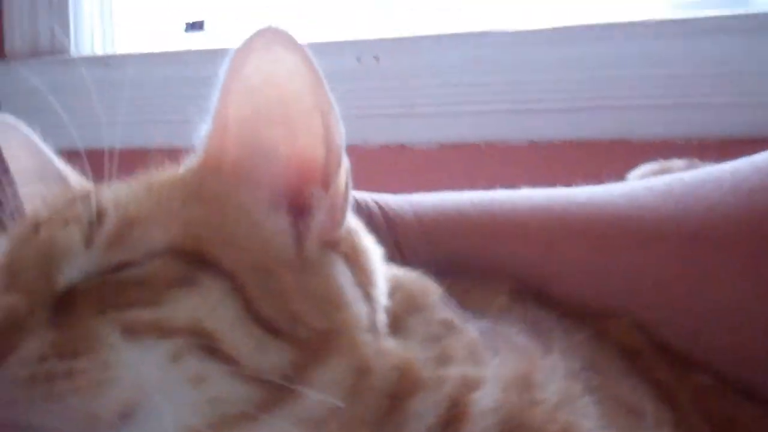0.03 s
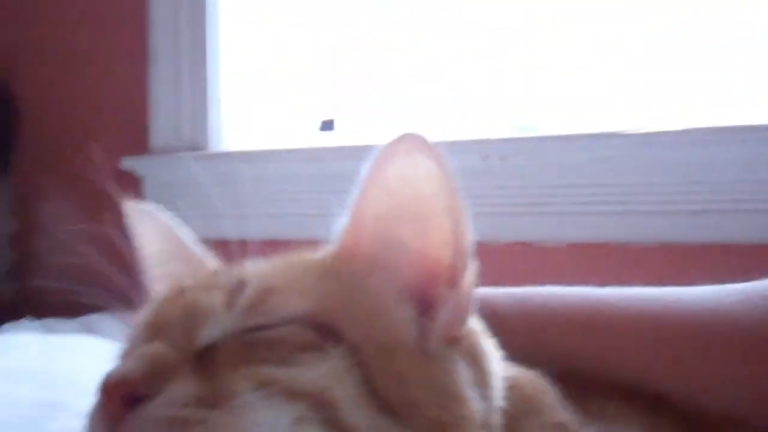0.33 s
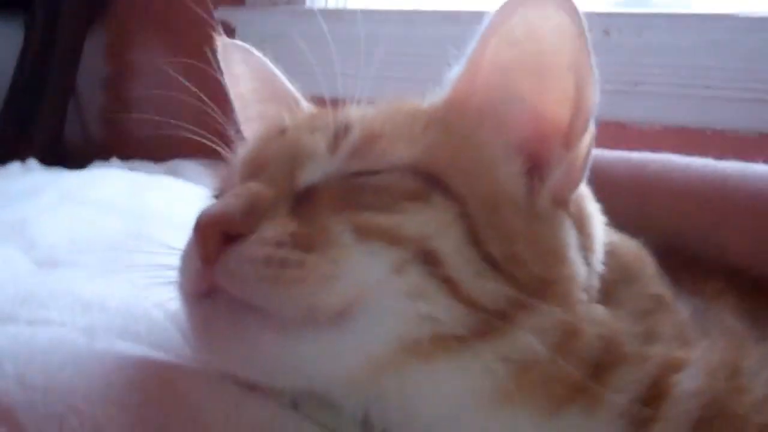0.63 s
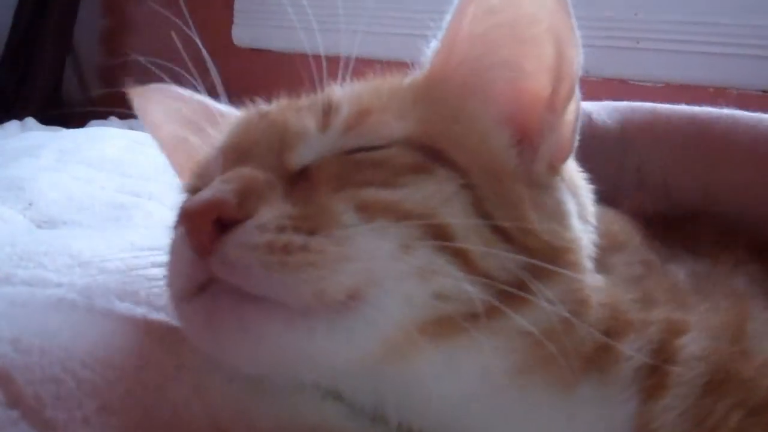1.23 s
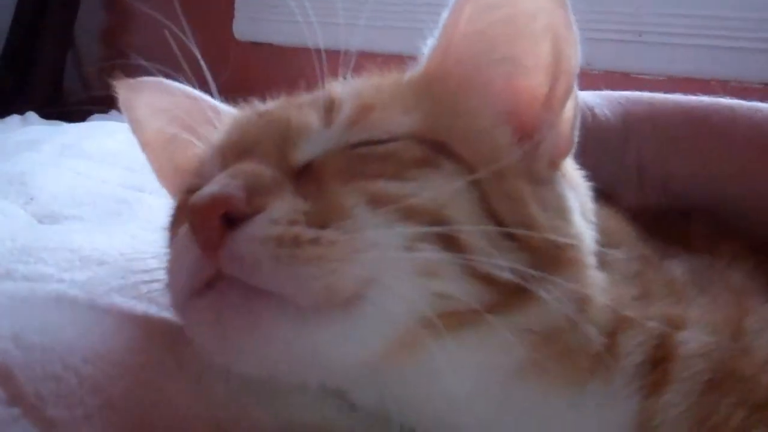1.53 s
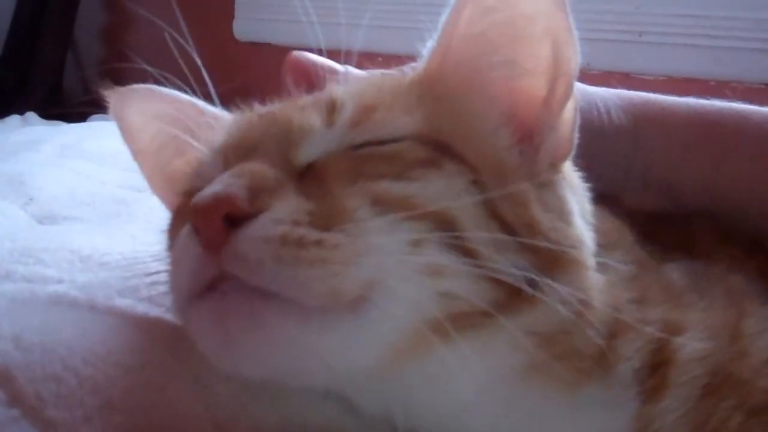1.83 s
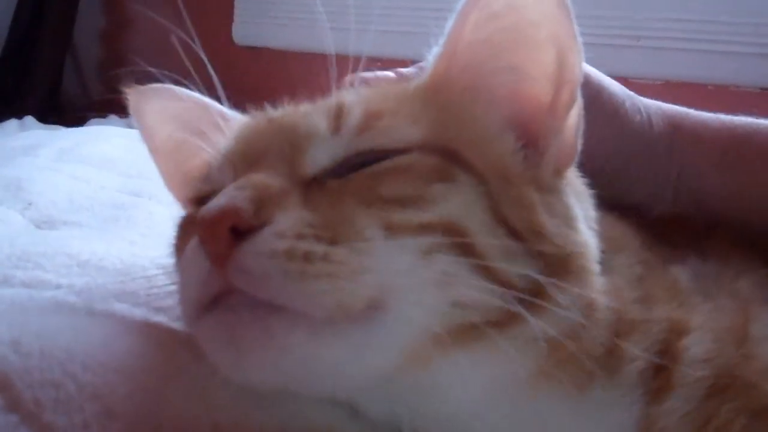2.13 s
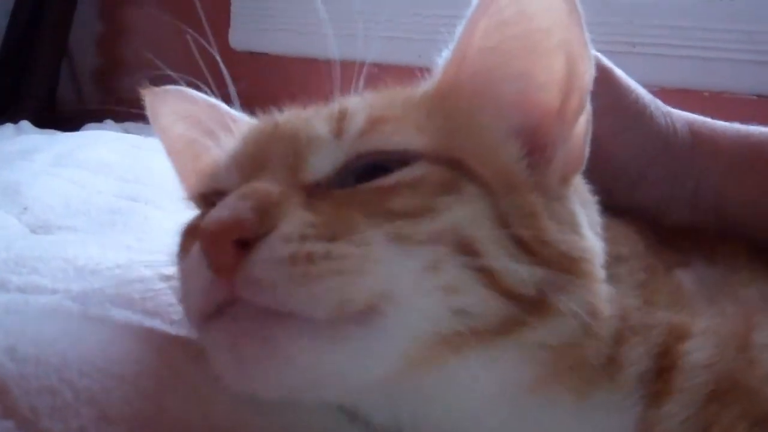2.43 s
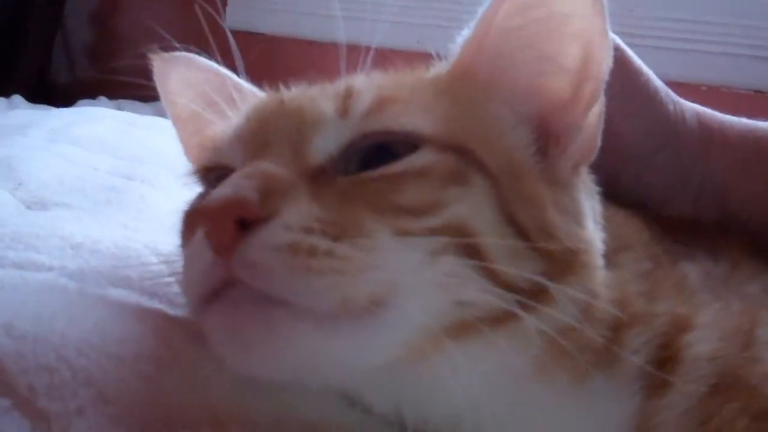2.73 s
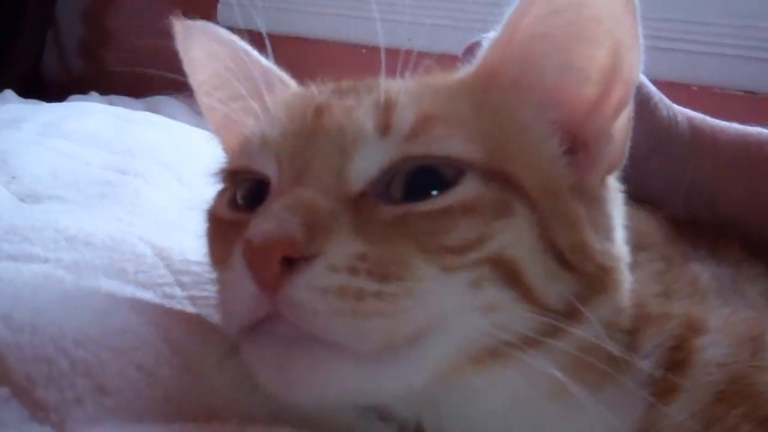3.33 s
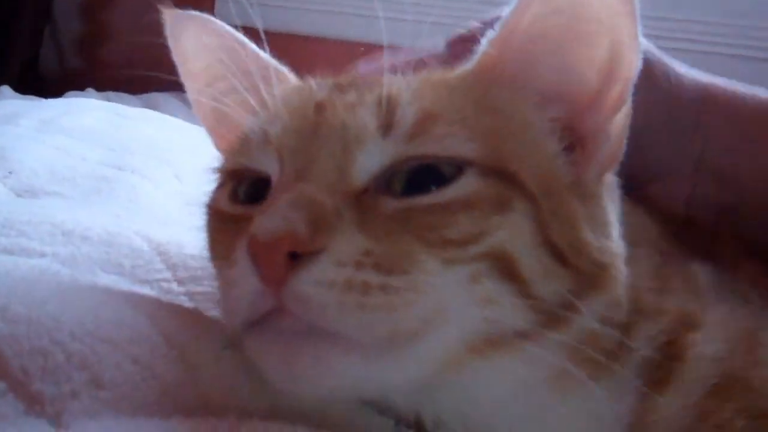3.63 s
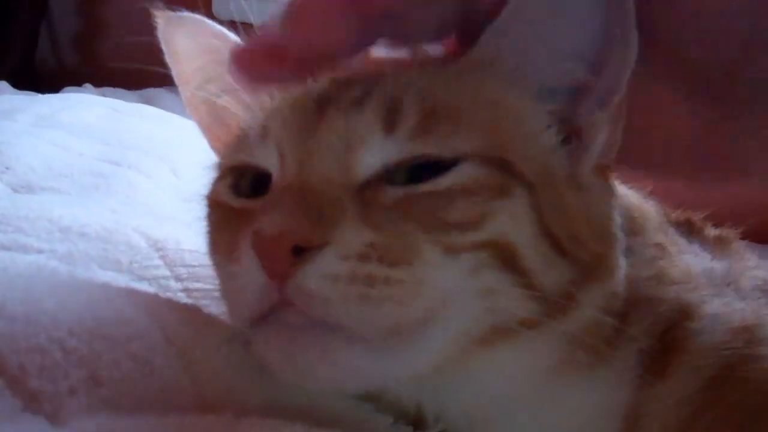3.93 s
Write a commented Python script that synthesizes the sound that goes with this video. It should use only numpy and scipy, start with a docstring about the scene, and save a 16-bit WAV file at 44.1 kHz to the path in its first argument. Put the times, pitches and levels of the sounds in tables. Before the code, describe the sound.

A kitten gives four short, low meows close by over soft room hiss.

```python
"""A kitten gives four short, low meows close by in a quiet, soft-furnished room. Each is vocal-fold
harmonics shaped by throat and mouth: a thin coo that mostly drops to a buzzier register and flips up.
The first, at 0.14 s, trills; a hand strokes fur faintly; the second comes at 1.4 s. At 2.4 s a chirp
leads into the third, with tiny ticks and more strokes in and after it. The last comes at 3.6 s.
Room hiss, hum and a faint high whine run throughout."""
import sys
import numpy as np
from scipy import signal
from scipy.fft import rfft, irfft
from scipy.io import wavfile

SR = 44100
rng = np.random.default_rng(int(sys.argv[2]) if len(sys.argv) > 2 else 0)


def materialize(psi):
    """Save the field psi as 16-bit PCM at rate SR to the path in sys.argv[1].

    A 1-D psi becomes a single channel; in a 2-D psi each row is a channel.
    """
    bounded = np.clip(np.atleast_2d(psi).T, -1, 1)
    quanta = np.round(bounded * 32767).astype(np.int16)
    wavfile.write(sys.argv[1], SR, quanta)


N = 176400
THROAT_EDGE_HZ, MOUTH_WIDTH_HZ, SHEEN_HZ = 2066, 610, 12700


def kitten():
    """Four meows and a lead-in chirp, a little to the left, with a faint short room tail."""
    # One entry per call: meow, meow, chirp, meow, meow.
    # vocal-fold pitch: time_s, pitch_hz
    pitches = [
        [(0.14, 637.5), (0.164, 584.4), (0.176, 593.7), (0.24, 413), (0.252, 435), (0.266, 404), (0.282, 430.7),
         (0.324, 432), (0.37, 484), (0.404, 398), (0.434, 467), (0.448, 571), (0.48, 583)],
        [(1.372, 637.6), (1.398, 620), (1.42, 613.5), (1.432, 573.5), (1.446, 592.4), (1.462, 577),
         (1.479, 524), (1.488, 540), (1.512, 520), (1.523, 499), (1.535, 540.6), (1.55, 447.4), (1.579, 474.3),
         (1.597, 450), (1.628, 442), (1.642, 458.2), (1.685, 438), (1.72, 437), (1.745, 407), (1.772, 423),
         (1.783, 540), (1.809, 541)],
        [(2.414, 697), (2.432, 606), (2.448, 556), (2.468, 637.7)],
        [(2.486, 616), (2.52, 609.5), (2.65, 560), (2.702, 590), (2.72, 625), (2.73, 649), (2.74, 652),
         (2.754, 660), (2.8, 580)],
        [(3.637, 589.5), (3.657, 554.5), (3.669, 455.4), (3.682, 548.4), (3.692, 493.4), (3.7, 381),
         (3.735, 415), (3.745, 390), (3.764, 393), (3.778, 349), (3.798, 382.4), (3.816, 384), (3.825, 423),
         (3.838, 429), (3.85, 515), (3.875, 490)],
    ]
    # voice strength: time_s, fundamental_db, overtone_db, treble_db
    strengths = [
        [(.139, -43, -55, -72), (.146, -43.5, -49.5, -63), (.174, -37.5, -44.5, -65), (.215, -38, -40, -58.5),
         (.255, -40.5, -38, -54), (.29, -38, -37.5, -54.5), (.33, -39, -39.5, -58), (.368, -34, -38.5, -57.5),
         (.405, -43, -37, -51.5), (.436, -33.5, -36.5, -53), (.446, -34.5, -51, -66), (.47, -43.5, -58, -63),
         (.483, -47, -68, -73)],
        [(1.37, -45, -68, -78), (1.379, -38.5, -49, -78), (1.394, -34.5, -48.5, -76), (1.44, -31.5, -42.5, -64),
         (1.505, -30.5, -34.5, -54), (1.535, -29, -36, -56.5), (1.58, -31, -34, -52.5), (1.62, -35, -35, -50),
         (1.714, -36, -36.5, -54), (1.768, -39, -39.5, -57.5), (1.782, -31.5, -48, -68),
         (1.794, -38.5, -57, -73), (1.809, -44.5, -64, -75), (1.817, -54, -72, -74)],
        [(2.414, -50, -58, -60), (2.421, -35.5, -45, -54), (2.438, -31.5, -37, -54), (2.454, -34, -33, -58),
         (2.47, -66, -67, -76)],
        [(2.485, -47, -30, -60), (2.49, -33, -33, -58), (2.505, -32, -32, -48), (2.555, -30.5, -34, -50.5),
         (2.62, -30.3, -35.5, -54), (2.7, -30.5, -38, -59.5), (2.75, -34.5, -53, -66), (2.783, -39, -50, -75),
         (2.8, -51, -74, -76)],
        [(3.634, -44, -66, -75), (3.641, -35, -45, -71), (3.657, -31, -41.5, -62.5), (3.686, -28.5, -40, -63),
         (3.702, -41, -41.5, -58), (3.728, -39.5, -41.5, -59), (3.8, -42, -39.5, -58.5),
         (3.822, -38.5, -56, -58.5), (3.838, -38.5, -45.5, -62), (3.854, -33, -59, -72), (3.872, -45, -62, -60),
         (3.883, -62, -72, -69)],
    ]
    # throat and mouth resonances: first_hz, second_hz, second_db, mouth_db, slope_db_per_octave
    throats = [(1230, 1900, -7, 18.5, -3), (1235, 1800, -7.5, 19, -3.5), (1210, 1750, -7, 14, -10),
               (1170, 1800, -1.5, 22, -3), (1170, 1660, -11, 15, -2)]
    # resonance just under 1 kHz: gain_db
    chests = [2.5, 4, 5, 9.5, -3]
    # thin resonance at the very top: gain_db
    sheens = [-14, -7, -12, -7, -19]
    left, right = sum(meow(*call) for call in zip(pitches, strengths, throats, chests, sheens))
    right_lag_s, tail_t60_s, tail_db = .000018, 0.12, -25.5
    t = np.arange(N) / SR
    direct = np.array([left, np.interp(t - right_lag_s, t, right)])
    tail = rng.standard_normal((2, N // 10)) * from_db(-60 * t[:N // 10] / tail_t60_s)
    tail /= np.sqrt((tail ** 2).sum(1, keepdims=True))
    return direct + from_db(tail_db) * signal.fftconvolve(direct, tail, axes=1)[:, :N]


def meow(pitch, strength, throat, chest_db, sheen_db):
    """One call: vocal-fold harmonics shaped by throat and mouth, with breath pulsed each cycle."""
    # upper mouth resonance: time_s, centre_hz
    mouth_track = [(.15, 4300), (.35, 4300), (.385, 3646), (.405, 3194), (.44, 3470), (1.45, 3900),
                   (1.52, 3600), (1.57, 4300), (1.63, 3980), (1.7, 4350), (1.78, 4220), (2.42, 3700),
                   (2.52, 3490), (2.6, 4100), (2.73, 4160), (3.64, 4800), (3.85, 4800)]
    # voice cracks: centre_s, half_length_s, roughness (0-1), fundamental_dip_db
    cracks = [(0.166, 0.0073, .5, 0.5), (0.187, 0.0082, 1, 6.5), (0.213, 0.0063, 0.56, 7),
              (0.436, 0.0057, 0.65, 2), (1.554, 0.01, 0.03, 5.5), (1.774, .005, 0.32, 3),
              (2.487, 0.0059, 0.41, 0.5), (3.669, 0.0055, 0.19, 7.5), (3.7, 0.0036, 0.08, 2),
              (3.78, 0.0035, 0.25, 30)]
    first_hz, second_hz, second_db, mouth_db, slope_db_per_octave = throat
    first_width_hz, second_width_hz, sheen_sag_hz_per_s = 200, 170, 6700
    trill_crest_s, trill_hz, trill_swing, trill_db = .227, 38.7, 0.09, 3.5
    buzz_hz, thinning_db_per_hz, ramp_s, breath_db = 439.5, 0.07, 0.0031, -12
    span = np.arange(int(strength[0][0] * SR), int(strength[-1][0] * SR))
    t, size = span / SR, len(span)
    fundamental_db, overtone_db, treble_db = along(strength, t)
    mouth_hz, = along(mouth_track, t)
    note_hz, = along(pitch, t)

    trill = np.cos(2 * np.pi * trill_hz * (t - trill_crest_s)) * swell(t, trill_crest_s, 0.1)
    crack = sum(rough * swell(t, s, half) for s, half, rough, _ in cracks)
    dip_db = sum(db * swell(t, s, half) for s, half, _, db in cracks)
    jitter = 0.01023 * (buzz_hz / note_hz) ** 2 * drift(120, size)
    pitch_hz = note_hz * (1 + trill_swing * trill + jitter + 0.146 * crack * drift(435, size))
    phase = 2 * np.pi * np.cumsum(pitch_hz) / SR

    k = np.arange(2, 34)[:, None]
    hz = k * pitch_hz
    formants = (first_hz, first_width_hz), (second_hz, second_width_hz), (mouth_hz, MOUTH_WIDTH_HZ)
    lag_rad = sum(np.pi / 2 + np.arctan(2 * (hz - centre) / width) for centre, width in formants)
    flutter_db = 1.95 * np.minimum(hz / 3000, 1) * np.array([drift(30, size) for _ in k])
    partials = np.cos(k * phase - lag_rad) * from_db(flutter_db)

    # above the buzzy register each further overtone is weaker
    thinning = from_db(-thinning_db_per_hz * np.maximum(pitch_hz - buzz_hz, 0) * (k - 2))
    throat_gain = (resonance(hz, first_hz, first_width_hz)
                   + from_db(second_db) * resonance(hz, second_hz, second_width_hz)
                   + from_db(chest_db) * resonance(hz, 960, 260))
    overtones = mix_partials(partials, thinning * throat_gain / (1 + (hz / THROAT_EDGE_HZ) ** 18))
    sheen_hz = SHEEN_HZ - sheen_sag_hz_per_s * (t - t.mean())  # sinks as the mouth closes
    colour = mouth_db, sheen_db, slope_db_per_octave
    treble = mix_partials(partials, mouth_gain(hz, mouth_hz, sheen_hz, *colour))

    puffs = rng.standard_normal(size) * (1 + .7 * np.cos(phase))
    breath_gain = mouth_gain(np.fft.rfftfreq(size, 1 / SR) + 1, mouth_hz.mean(), SHEEN_HZ, *colour)
    breath = rms_one(irfft(rfft(puffs) * breath_gain, size))

    fundamental = from_db(fundamental_db + trill_db * trill - dip_db) * np.sqrt(2) * np.cos(phase)
    body = fundamental + from_db(overtone_db) * overtones
    top = from_db(treble_db + 2) * (treble + from_db(breath_db) * breath)
    gate = np.clip(np.minimum(t - t[0], t[-1] - t) / ramp_s, 0, 1)
    shimmer = from_db(.5 * drift(87, size))
    rasp = 1 + 0.38 * crack * np.cos(phase / 2)  # alternate cycles differ in a crack
    out = np.zeros((2, N))
    out[:, span] = -gate * shimmer * rasp * (body * pan(left_db=5) + top * pan(left_db=6.5))
    return out


def mouth_gain(hz, mouth_hz, sheen_hz, mouth_db, sheen_db, slope_db_per_octave):
    """Colour of the mouth and nose above the throat resonances."""
    # base treble response: freq_hz, gain_db
    response = [(1900, -44), (2300, 8), (2900, 5.5), (4000, -1.5), (5300, -4.5), (6100, 2), (7000, 8),
                (8200, -1.5), (9600, 7), (11000, -6), (13200, -27)]
    fall = from_db(slope_db_per_octave * np.log2(np.maximum(hz, THROAT_EDGE_HZ) / THROAT_EDGE_HZ))
    mouth = 1 + from_db(mouth_db) * resonance(hz, mouth_hz, MOUTH_WIDTH_HZ) ** 2
    sheen = from_db(sheen_db) * resonance(hz, sheen_hz, 700) ** 2
    return fall * (from_db(at_hz(response, hz)) * mouth + sheen)


def stroking():
    """A hand rubs fur in soft swells of noise; mouth, fur and bedding give tiny bright ticks."""
    # hand strokes: centre_s, half_length_s, level_db
    strokes = [(0.746, 0.022, -65), (.92, .015, -67), (1.033, .015, -65), (1.812, 0.043, -60.5),
               (2.604, 0.0068, -50), (2.796, 0.014, -56.5), (2.937, 0.0093, -57.5), (3.147, 0.011, -57.5),
               (3.223, 0.015, -53.5), (3.286, 0.086, -59)]
    # fur noise spectrum: freq_hz, density_db
    fur = [(1500, -8), (3500, 10.5), (6000, 5), (9500, 4), (11500, -19), (13500, -31)]
    # ticks before the band-pass: start_s, level_db
    tick_events = [(2.416, -46), (2.4905, -37), (2.516, -44), (2.601, -44), (2.784, -50), (3.2252, -38),
                   (3.2625, -47)]
    tick_decay_s = 0.00044
    t = np.arange(N) / SR
    rub = sum(from_db(db) * swell(t, s, half) for s, half, db in strokes)
    snaps = sum(from_db(db) * (t >= s) * np.exp(-np.abs(t - s) / tick_decay_s) for s, db in tick_events)
    ticks = band_pass(snaps * rng.standard_normal((2, N)) + 1e-18, 2900, 9500)
    return (rub * banded_noise(fur) + ticks) * pan(left_db=2.8)


def room():
    """Steady hiss with wavering mains hum and a thin electronic whine."""
    # hiss spectrum: freq_hz, density_db
    hiss_spectrum = [(18, -38), (30, -6.5), (54, -2.5), (102, -8.5), (238, -6.5), (439, -12), (567, -7.5),
                     (661, -12.5), (1190, -14), (1460, -20.5), (1700, -12.5), (1980, -18.5), (8100, -30),
                     (10700, -40), (13500, -56)]
    # hums: centre_hz, width_hz, level_db
    hums = [(49.2, 1.6, -64), (146.1, 6.6, -68.5), (228, 20, -68.5), (1188, 67, -69.5)]
    # whine tones: pitch_hz, level_db
    whines = [(7852, -82), (7882, -80)]
    t = np.arange(N) / SR
    hum = sum(from_db(db) * drift(width / 2, N) * wave(2 * np.pi * hz * t)
              for hz, width, db in hums for wave in (np.cos, np.sin))
    whine = sum(from_db(db) * np.sqrt(2) * np.sin(2 * np.pi * hz * t) for hz, db in whines)
    hiss = from_db(-50.5) * banded_noise(hiss_spectrum)
    return (hiss + hum + whine) * pan(left_db=3.5)


def banded_noise(spectrum):
    """Third-octave bands of stereo noise, alike in the bass and diffuse in the treble; rms 1."""
    # left-right likeness: freq_hz, correlation
    likeness = [(60, 0.8), (130, 0.92), (280, 0.88), (600, 0.85), (1300, 0.66), (2800, 0.19), (6050, 0.095),
                (13000, 0.07)]
    out, edges_hz = 0, 22 * 2 ** (np.arange(29) / 3)
    white = rng.standard_normal((2, 2, N))
    for k, (low_hz, high_hz) in enumerate(zip(edges_hz, edges_hz[1:])):
        mid, side = band_pass(white[k % 2], low_hz, high_hz)
        hz = np.sqrt(low_hz * high_hz)
        alike = at_hz(likeness, hz)
        band = np.sqrt(1 + alike) * mid + np.sqrt(1 - alike) * side * [[1], [-1]]
        out = out + from_db(at_hz(spectrum, hz)) * band
    return rms_one(out)


def mix_partials(partials, gains):
    """Weighted sum of unit sinusoids, rms near 1."""
    return (gains * partials).sum(0) / np.sqrt((gains ** 2).sum(0) / 2)


def resonance(hz, centre_hz, width_hz):
    """Gain of one resonance, peak 1."""
    return 1 / np.sqrt(1 + (2 * (hz - centre_hz) / width_hz) ** 2)


def drift(rate_hz, size):
    """Smooth random wander, rms 1."""
    pole = np.exp(-2 * np.pi * rate_hz / SR)
    wander = signal.lfilter([1], [1, -2 * pole, pole * pole], rng.standard_normal(2 * size))
    return rms_one(wander[size:])


def swell(t, centre_s, half_length_s):
    """Gaussian bump, peak 1."""
    return np.exp(-((t - centre_s) / half_length_s) ** 2)


def along(rows, t):
    """Each column of a curve at times t."""
    time_s, *columns = np.transpose(rows)
    return [np.interp(t, time_s, column) for column in columns]


def at_hz(points, hz):
    """Interpolate on a log-frequency axis."""
    freq_hz, values = np.transpose(points)
    return np.interp(np.log(hz), np.log(freq_hz), values)


def band_pass(x, low_hz, high_hz):
    return signal.sosfilt(signal.butter(2, [low_hz, high_hz], "band", fs=SR, output="sos"), x)


def pan(left_db):
    """Stereo gains, left louder than right by left_db."""
    gains = from_db(np.array([[left_db], [-left_db]]) / 2)
    return gains / gains.mean()


def from_db(db):
    return 10 ** (np.asarray(db) / 20)


def rms_one(x):
    return x / np.sqrt(np.mean(x ** 2) + 1e-20)


def scene():
    """Kitten, hand and room."""
    return kitten() + stroking() + room()


def record(dry):
    """Deep bass rolled off, top cut steeply."""
    low_cut_hz, high_cut_hz = 42, 13400
    lean = signal.sosfilt(signal.butter(2, low_cut_hz, "high", fs=SR, output="sos"), dry)
    return signal.sosfilt(signal.ellip(10, .2, 80, high_cut_hz, fs=SR, output="sos"), lean)


dry = scene()
out = record(dry)
materialize(out)
```